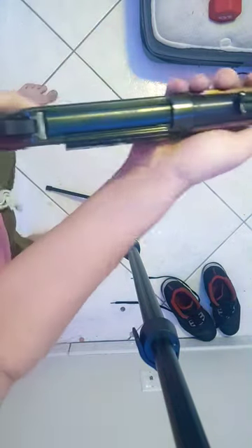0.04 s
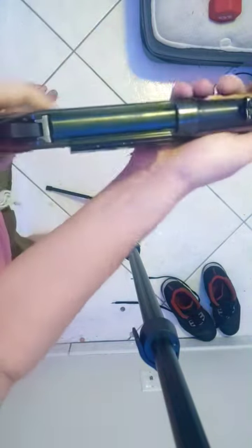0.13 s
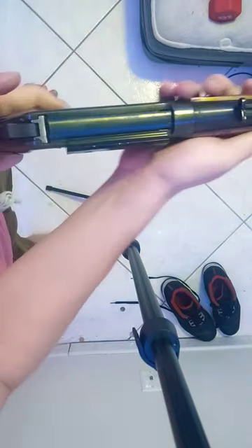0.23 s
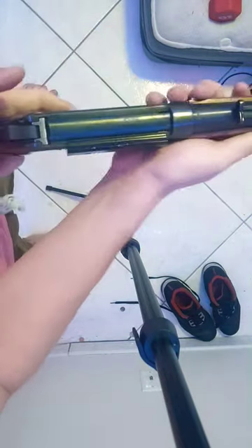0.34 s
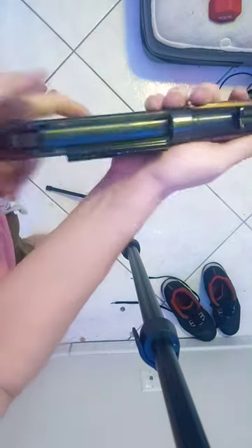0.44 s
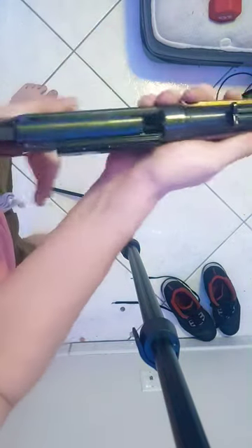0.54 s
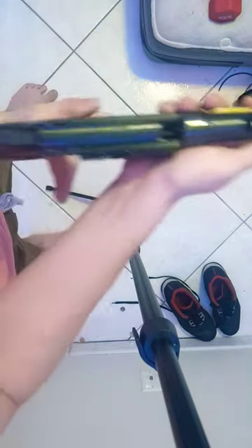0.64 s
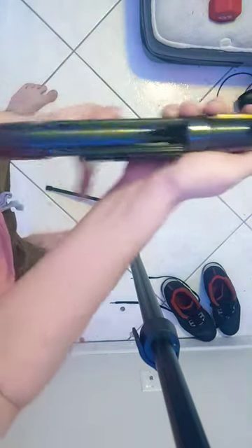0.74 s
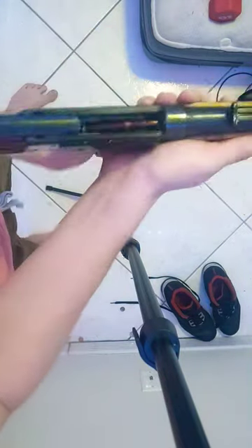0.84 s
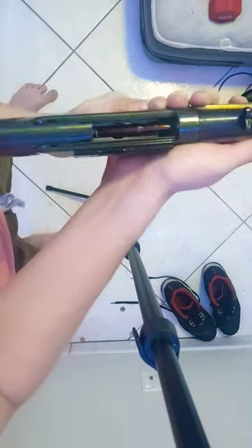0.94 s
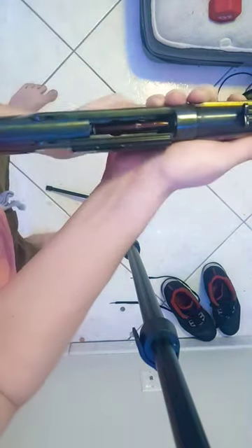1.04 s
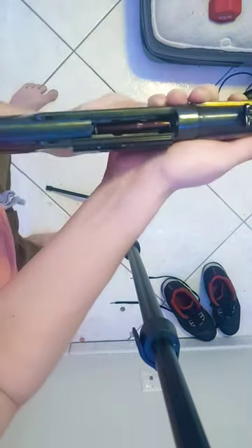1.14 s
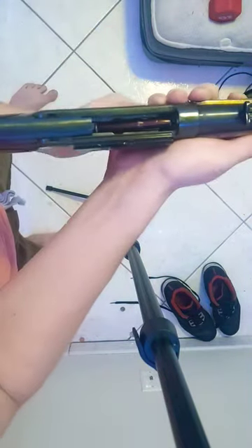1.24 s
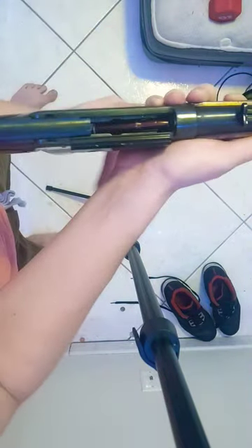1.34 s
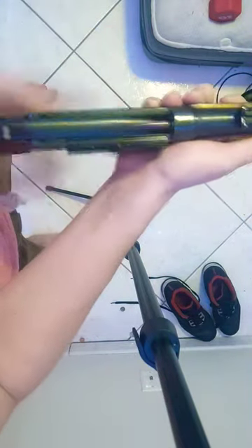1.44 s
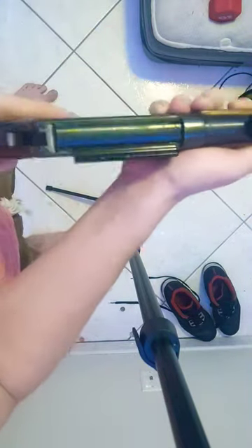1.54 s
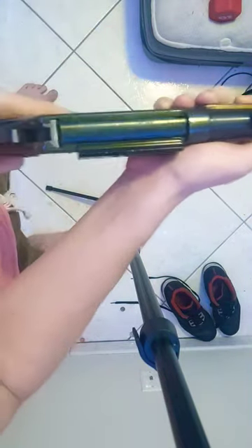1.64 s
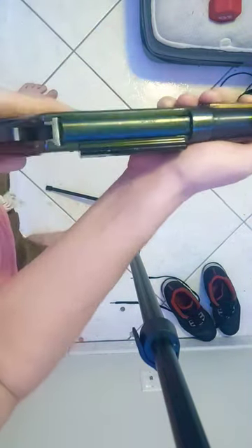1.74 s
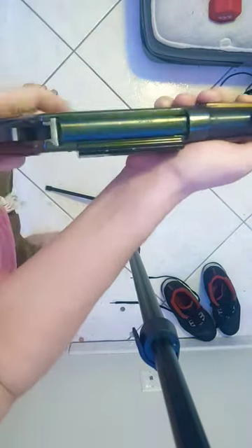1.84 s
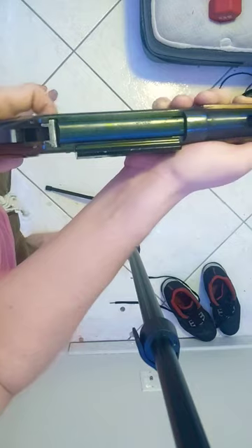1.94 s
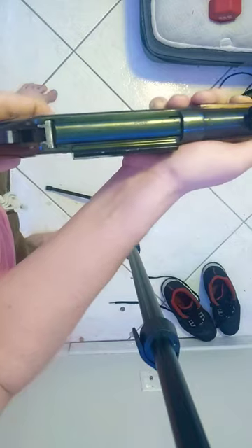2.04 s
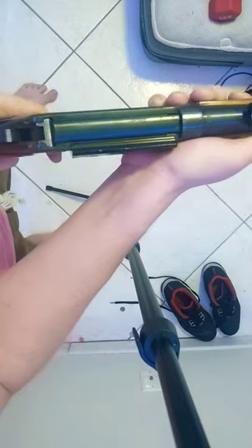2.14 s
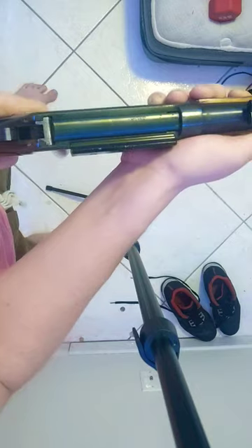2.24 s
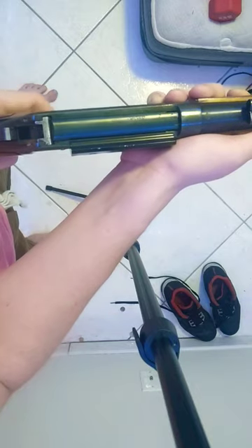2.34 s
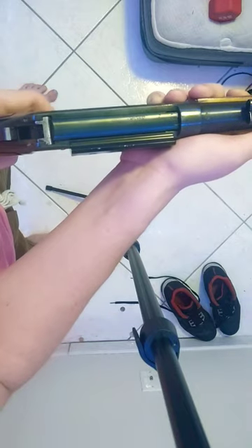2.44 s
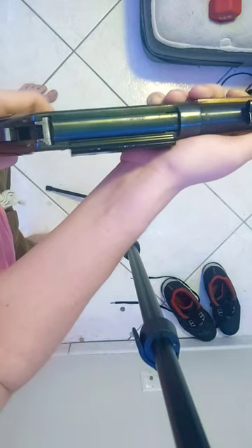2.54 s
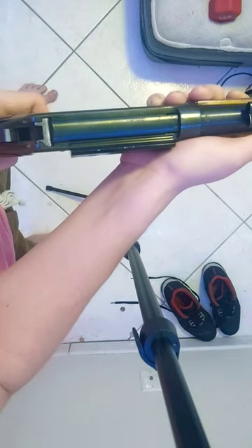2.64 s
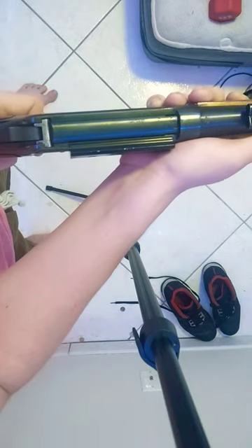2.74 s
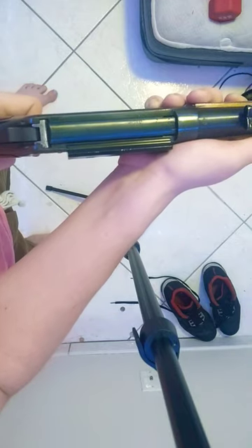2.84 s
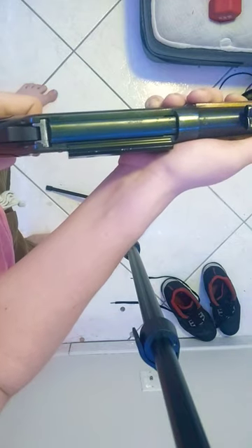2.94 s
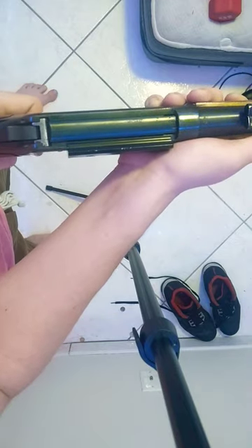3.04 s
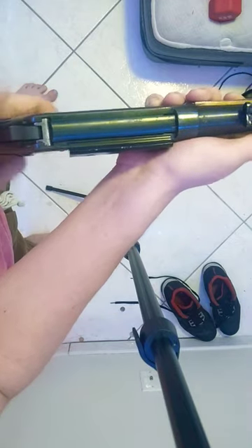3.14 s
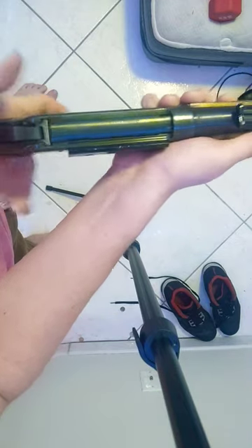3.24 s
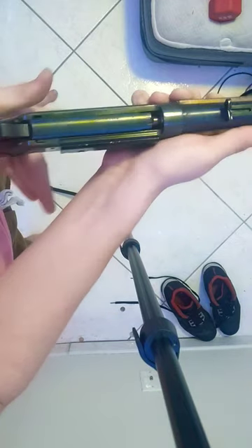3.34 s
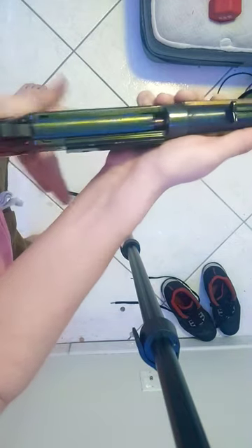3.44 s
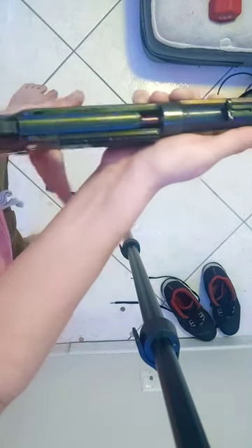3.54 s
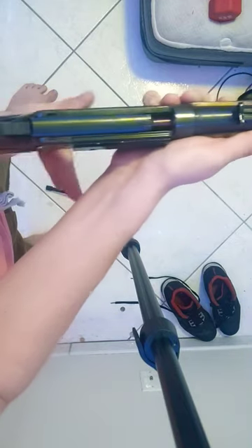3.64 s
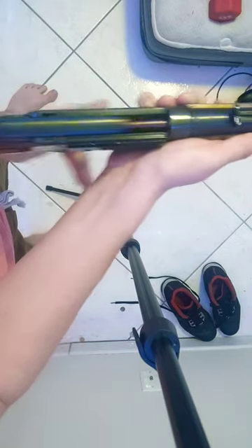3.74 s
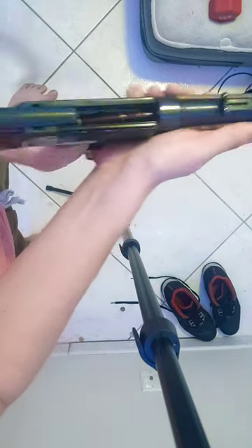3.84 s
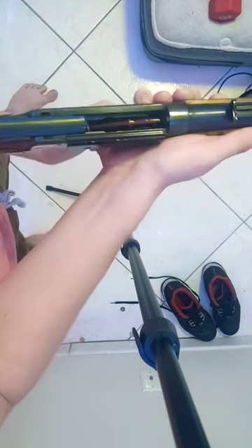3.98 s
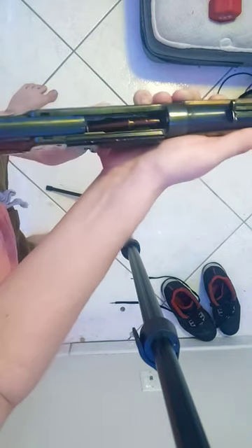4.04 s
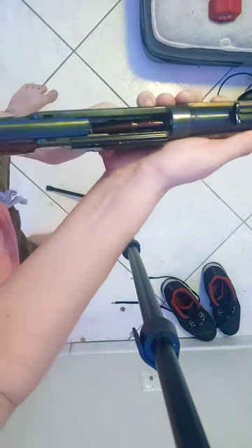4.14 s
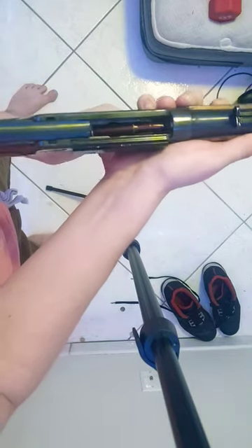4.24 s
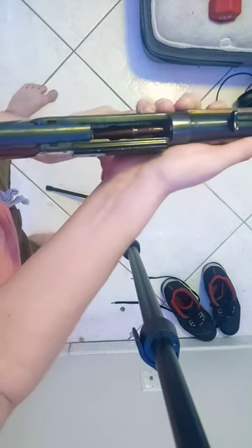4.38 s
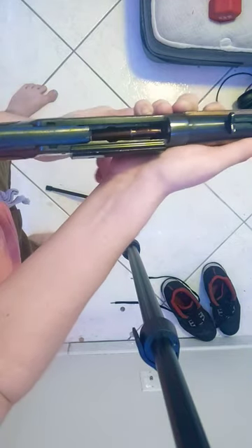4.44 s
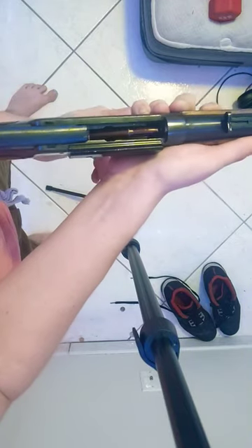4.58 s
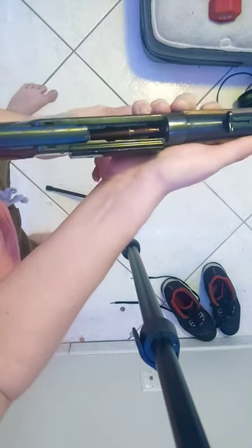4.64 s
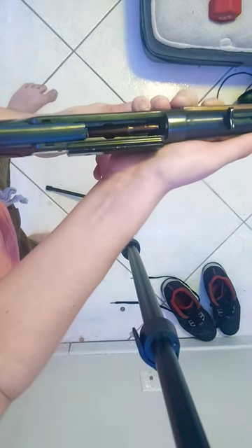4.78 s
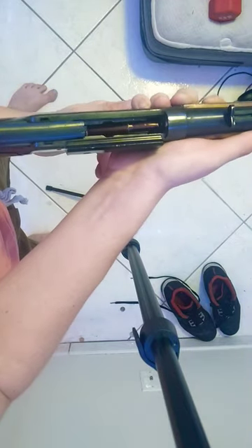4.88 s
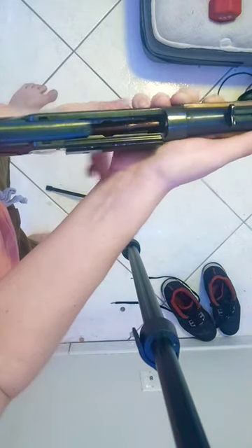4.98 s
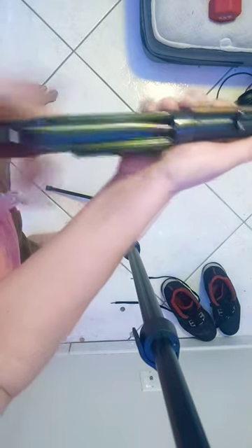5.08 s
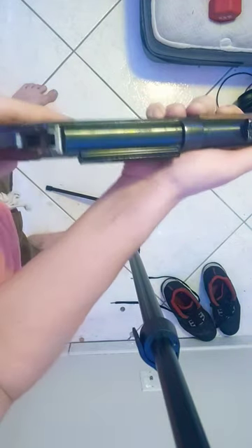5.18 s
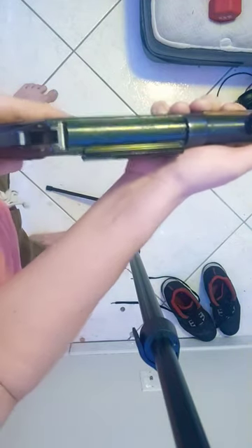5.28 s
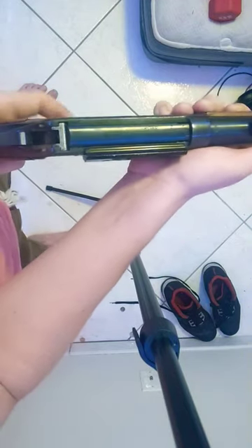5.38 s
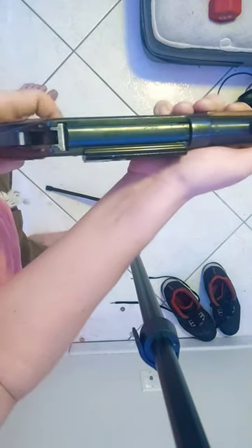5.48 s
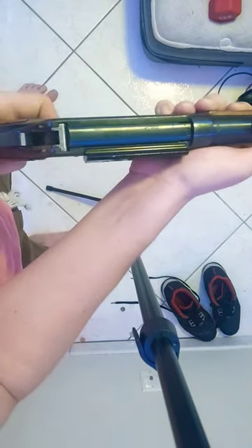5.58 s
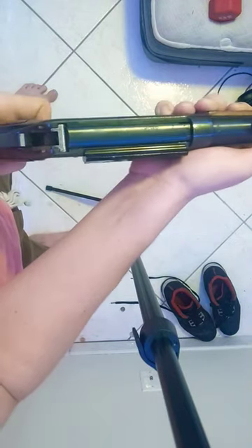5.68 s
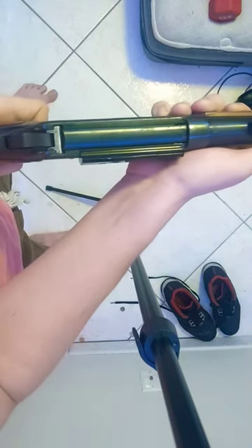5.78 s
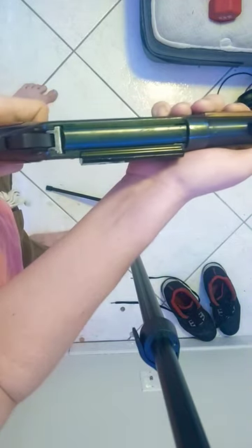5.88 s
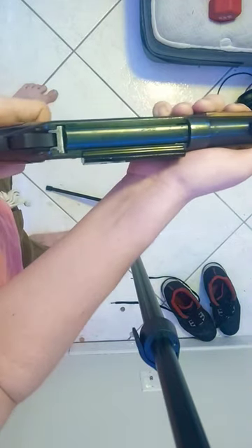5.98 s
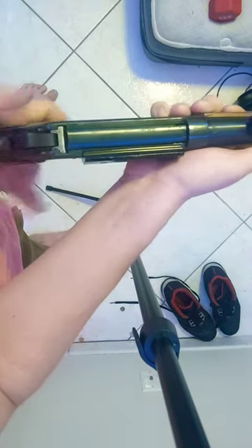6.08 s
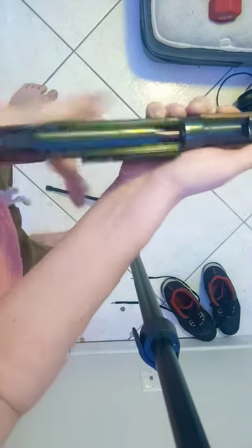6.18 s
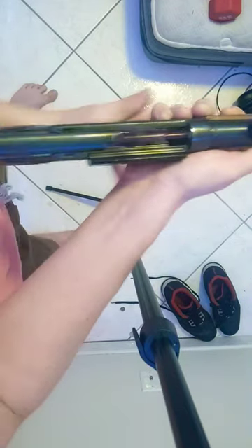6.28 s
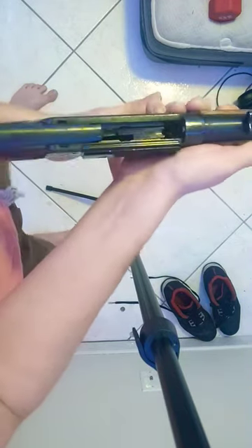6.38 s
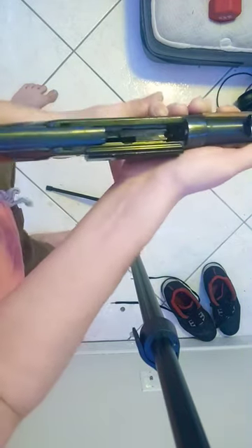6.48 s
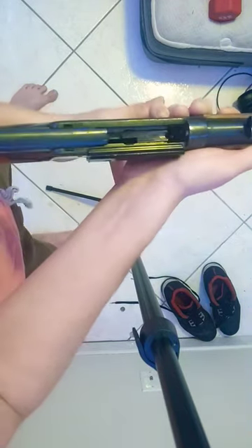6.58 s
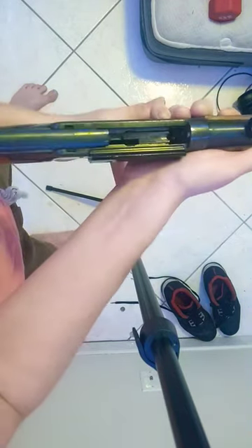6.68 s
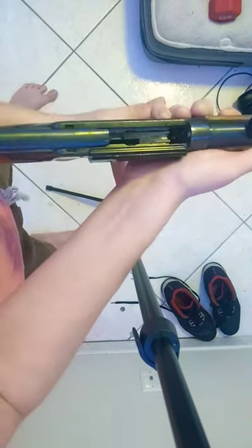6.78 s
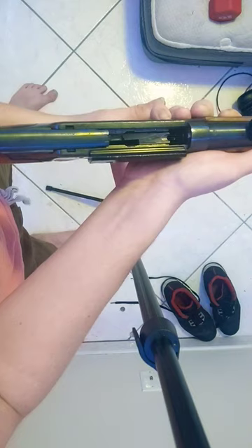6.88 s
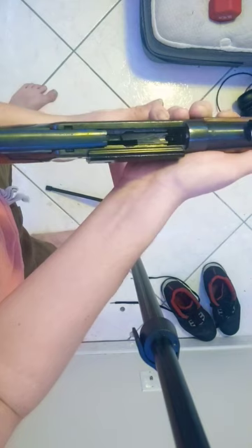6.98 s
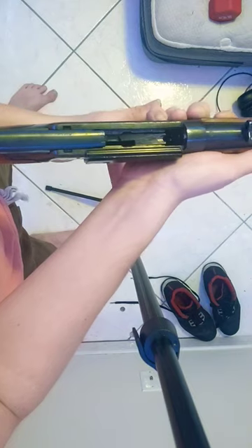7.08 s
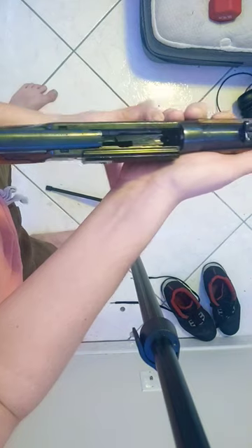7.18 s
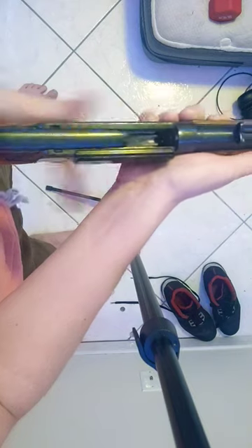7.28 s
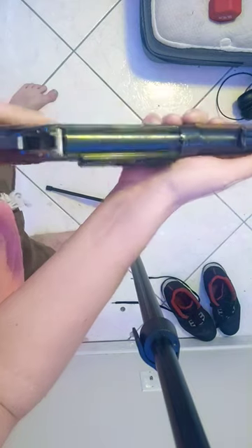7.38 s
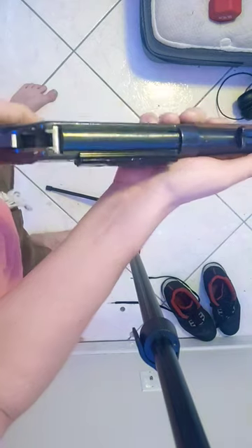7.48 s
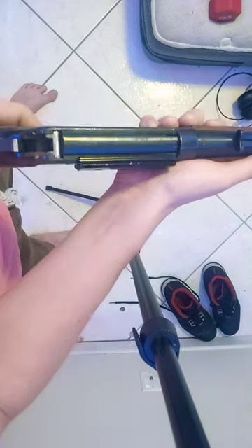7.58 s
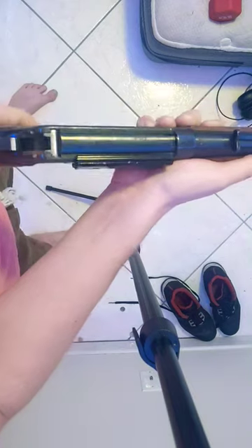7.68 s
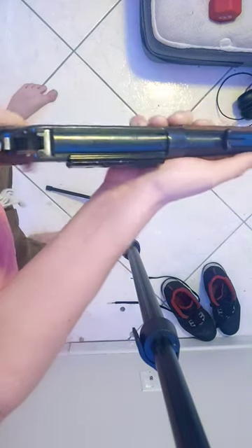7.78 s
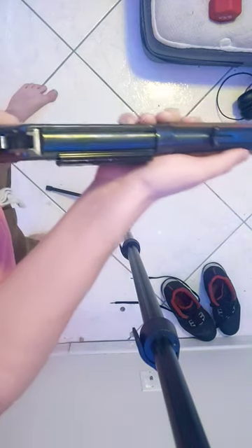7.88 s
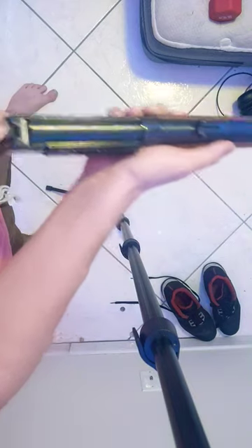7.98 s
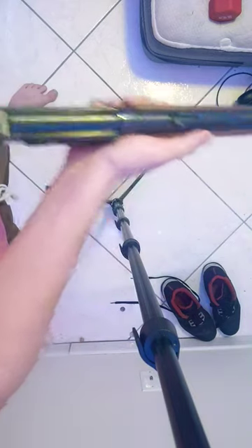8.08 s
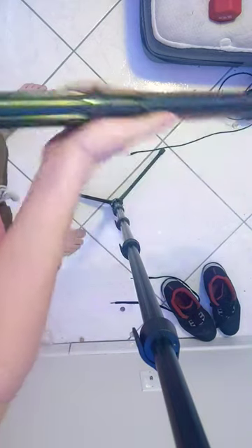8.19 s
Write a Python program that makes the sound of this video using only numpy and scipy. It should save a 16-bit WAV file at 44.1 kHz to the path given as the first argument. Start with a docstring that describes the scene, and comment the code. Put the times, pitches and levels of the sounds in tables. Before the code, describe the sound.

A quiet room with a faint low drone, miked very close. At about 0.55 s a rifle lever unlatches with a bright clack, small catches click, and at 0.94 the bolt hits its stop hard, with a thin high cartridge ring. After a pause, ticks and a chattering double clack close it at 1.5-1.65. The hammer snaps loudly at 2.9. The lever opens again at 3.4, with a sharp click at 3.6 and a double stop blow at 3.95. A cartridge knocks on the tiles from 4.7 to 5.16, rattling hollowly and ringing near 12 kHz; the lever clacks shut around 5.25. Another hammer snap with a low thump comes at 5.86. A quick opening clatters at 6.25-6.45; closing at 7.4-7.5 mixes with hard cartridge knocks, a deeper thump and bright shimmering rings. Bounces and clicks continue until about 8.15. Dense, short reflections follow every blow.

```python
"""Steel clacks close to the microphone: a lever rifle is cycled with dummy cartridges in a small tiled room.
Three times the lever opens and shuts, twice the hammer snaps: coloured bursts of noise with short body tones.
Ejected cases knock on the floor and ring near 12 kHz as beating sines; three low thumps hum on briefly.
Dense, fast-dying reflections answer every clack over faint room noise and a drone, and the recorder's
limiter holds the loudest blows down for a moment."""
import sys
import numpy as np
from scipy import signal
from scipy.fft import rfft, irfft
from scipy.io import wavfile
from scipy.ndimage import uniform_filter1d, minimum_filter1d

SR = 44100
rng = np.random.default_rng(int(sys.argv[2]) if len(sys.argv) > 2 else 0)


def wav_record(signal):
    """Record a signal, one row per channel, as 16-bit PCM in the file named by sys.argv[1]."""
    frames = np.transpose(np.atleast_2d(signal))
    bounded = np.clip(frames, -1, 1)
    # unit amplitude maps onto the largest positive 16-bit level
    quanta = np.round(bounded * 32767).astype(np.int16)
    wavfile.write(sys.argv[1], SR, quanta)


N = 362502  # samples

# colour of a steel clack, with the broad resonances of the receiver: f/Hz, relative level/dB per Hz
STEEL_COLOUR = [(60, -25), (200, -27), (550, -15.5), (950, -11.5), (1400, -3.5), (2000, 0.5), (2900, -1.5),
                (4600, 2), (7500, 3), (9500, -2.5), (11000, -1.5), (13500, -6), (15300, -4.5)]
# lever thrown open: unlatch t/s, bolt starts back t/s, bolt hits its stop t/s,
# unlatch level/dB, drag level/dB, stop level/dB, ring of the lifted cartridge level/dB
OPENINGS = [(0.546, .892, .938, -7.5, -21, 4, -9.5), (3.393, 3.811, 3.950, -2.5, -32.5, 3, -10.5),
            (6.254, 6.253, 6.428, -6, -26, 1, -44)]
# lever pulled shut: start t/s, cartridge seats t/s, bolt locks t/s, drag level/dB, blow level/dB
CLOSINGS = [(1.545, 1.613, 1.628, -16.5, 4), (5.15, 5.241, 5.268, -20.5, -0.5),
            (7.407, 7.485, 7.504, -22.5, 3.5)]
# ejected cartridges bouncing on the tiles: t/s, knock level/dB, ring level/dB
BOUNCES = [(4.720, -4.5, -3.5), (4.797, -8.5, -9), (4.934, -19, -4.5), (4.965, -14.5, -2.5),
           (5.093, -14.5, -3.5), (5.163, -11.5, -5.5), (7.415, -5.5, 0.5), (7.469, -1, -2),
           (7.725, -17.5, -44), (7.759, -7, -28.5), (7.847, -7, -5), (7.977, -35, -19), (8.111, -14, -6)]
SEAR_TILT = -1.5  # brightness of the sear and of the lever's play, dB per octave


def amp(db):
    """Decibels to gain."""
    return 10 ** (np.asarray(db) / 20)


def evened(x):
    """Scales to rms 1."""
    return x / np.sqrt(np.mean(x ** 2) + 1e-20)


def read(points, hz):
    """Reads a table on a log-frequency axis."""
    f, value = np.transpose(points)
    return np.interp(np.log(hz + 1), np.log(f + 1), value)


def add(mix, s, sound):
    """Mixes a sound in at time s."""
    part = mix[round(s * SR):][:len(sound)]
    part += sound[:len(part)]


def colour(x, points, tilt=0, size=2048):
    """Causal filter of unit power with the given spectrum, tilted about 5 kHz by dB per octave."""
    hz = abs(np.fft.fftfreq(size, 1 / SR))
    octaves = np.log2(np.clip(hz, 700, 10000) / 5000)
    gain = evened(amp(read(points, hz) + tilt * octaves))
    # minimum phase: the energy comes as early as the spectrum allows
    spectrum = np.exp(np.conj(signal.hilbert(np.log(gain))))
    taps = np.fft.ifft(spectrum).real
    return signal.fftconvolve(x, taps[:size // 2])[:len(x)]


def ring(modes, t):
    """Dying sines, one for each (Hz, dB, t60 s)."""
    return sum(amp(db - 60 * t / t60) * np.sin(2 * np.pi * hz * t) for hz, db, t60 in modes)


def grit(count, grain_db):
    """Noise that comes in millisecond catches of very uneven strength."""
    strengths = amp(grain_db * np.minimum(rng.exponential(1, 320), 3))
    snap = np.exp(-np.arange(50) / 22)
    envelope = np.outer(strengths, snap).ravel()
    return evened(envelope * rng.standard_normal(size=16000))[:count]


def contact(t, t60, chatter_db, chatter_t60, rise_s=0.00043, grain_db=5):
    """A burst of micro-impacts, coloured differently each time, then the ticking chatter of loose parts."""
    shape = amp(-60 * t / t60) * (1 - np.exp(-t / rise_s))
    z = rfft(shape * rng.standard_normal(len(t)))
    # partly flatten the spectrum, then shape the burst lightly again
    burst = irfft(z / abs(z) ** .65, len(t)) * shape ** .2
    chatter = amp(chatter_db - 60 * t / chatter_t60) * grit(len(t), grain_db)
    return burst * np.linalg.norm(shape) / np.linalg.norm(burst) + chatter


def resonate(x, hz, width):
    """A resonance of gain 1, width in Hz, that follows the curve hz."""
    turn = np.exp(2j * np.pi * np.cumsum(hz) / SR)
    r = np.exp(-np.pi * width / SR)
    return 2 * (turn * signal.lfilter([1 - r], [1, -r], x / turn)).real


def action():
    """The lever opens and shuts, the hammer falls, and small catches click in between."""
    # trigger pulled: sear ticks t/s, hammer strikes t/s, force level/dB, lead level/dB
    shots = [(2.825, 2.877, 6, -20), (5.772, 5.861, 5, -8.5)]
    # catches of lever, carrier and hammer: t/s, force level/dB, brightness/dB per octave
    catches = [(0.586, -16, 0.5), (.666, -13.5, 1), (.817, -15, 4), (1.474, -27.5, -1), (1.509, -17.5, 1.5),
               (1.531, -12, 4), (1.542, -10.5, 4), (1.594, -11.5, -4), (3.229, -36.5, -1),
               (3.248, -35.5, -3), (3.351, -33, 3), (3.588, -20.5, 5), (3.598, -20, 0), (3.619, -3, 4.5),
               (3.843, -10, 2), (3.903, -9.5, 2), (5.095, -16.5, -7), (5.172, -3, -3.5), (5.227, -4.5, -3),
               (5.882, 3.5, 4), (6.169, -29, -1.5), (6.309, -6, 2), (6.381, -12.5, 1.5),
               (7.334, -35.5, -2.5), (7.363, -30.5, -3), (7.393, -29, -4.5), (7.976, -10.5, 2),
               (8.124, -5.5, 2.5), (8.143, -7, -2.5)]
    # blows that land squarely and ring the receiver for a few cycles: t/s, level/dB, f/Hz
    square_blows = [(.939, -4, 2550), (3.619, -11, 1707), (3.958, -6.5, 2120), (5.227, -5.5, 2000),
                    (5.861, -7, 1350), (7.760, -9.5, 2040)]
    # knock of the stock under the hammer: f/Hz, level/dB, t60/s
    hammer_wood = [(470, -27.5, 0.02), (640, -23.5, 0.018)]
    open_tilt, stop_tilt, close_tilt = 3.7, 0.46, 1.8  # brightness, dB per octave
    lock_tilt, hammer_tilt = -0.61, 0.71  # dB per octave
    rebound_s, lead_s = 0.0062, 0.0073
    out, t = np.zeros(N), np.arange(SR // 6) / SR

    for unlatch, start, stop, unlatch_db, drag_db, stop_db, _ in OPENINGS:
        # a softer clack 4 ms before the unlatching clack
        add(out, unlatch - .004, clack(unlatch_db - 11.5, open_tilt))
        add(out, unlatch, clack(unlatch_db, open_tilt))
        # the bolt breaks loose with a click and slides back
        add(out, start, clack(-12, open_tilt))
        add(out, start, drag(stop - start, drag_db, open_tilt, swell_db=1.5))
        # it rebounds once from its stop, and the loose carrier rattles on
        add(out, stop, clack(stop_db, stop_tilt))
        add(out, stop + rebound_s, clack(stop_db - 1.5, stop_tilt))
        add(out, stop + rebound_s, drag(.04, stop_db - 26, stop_tilt, swell_db=-3))
    for start, seat, lock, drag_db, blow_db in CLOSINGS:
        add(out, start, drag(lock - start, drag_db, close_tilt, swell_db=-2.5))
        for s in (seat, lock):
            add(out, s, clack(blow_db, lock_tilt))
    for sear, strike, db, lead_db in shots:
        add(out, sear, clack(-34, SEAR_TILT))
        # a softer clack 7 ms before the hammer strike
        add(out, strike - lead_s, clack(lead_db, hammer_tilt))
        add(out, strike, clack(db, hammer_tilt) + amp(db) * ring(hammer_wood, t))
    for s, db, tilt in catches:
        add(out, s, clack(db, tilt))
    for s, db, hz in square_blows:
        # 20 cycles until the tone has fallen 60 dB
        add(out, s, ring([(hz, db, 20 / hz)], t))
    return out


def clack(db, tilt, detune=0.17, spread_db=3, rise_s=.001):
    """One blow of steel on steel; the body answers a little differently to each."""
    # short hollow tones of the wooden stock and the receiver: f/Hz, level/dB, t60/s
    body = [(400, -41.5, 0.0083), (620, -41.5, 0.02), (2050, -30.5, 0.01)]
    t = np.arange(SR // 6) / SR
    burst = contact(t, t60=0.024, chatter_db=-16, chatter_t60=0.05)
    steel = colour(burst, STEEL_COLOUR, tilt)
    chance = 2 * rng.random((len(body), 2)) - 1
    modes = [(hz * (1 + detune * a), level + spread_db * b, t60)
             for (hz, level, t60), (a, b) in zip(body, chance)]
    return amp(db) * (steel + ring(modes, t) * (1 - np.exp(-t / rise_s)))


def drag(length, db, tilt, swell_db, grain_db=-1.5, grit_db=-4.5):
    """Parts slide over each other: grit and small random catches, growing or fading along the way."""
    count, out = round(length * SR), np.zeros(SR // 2)
    swell = amp(grit_db + swell_db * np.linspace(-.5, .5, count))
    add(out, 0, swell * colour(grit(count, grain_db), STEEL_COLOUR, tilt))
    ticks = max(round(length * 70), 1)  # 70 per second
    for k in range(ticks):
        along = (k + rng.random()) / ticks
        strength, hue = 2 * rng.random(2) - 1
        tick_db = 7.5 + 1.5 * strength + swell_db * (along - .5)
        add(out, along * length, clack(tick_db, tilt + 3 * hue))
    return amp(db) * out


def landings(grain_db=4):
    """Cartridges knock dully on the floor; after a hard landing they rattle with a hollow, sinking tone."""
    # colour of a knock on the tiles: f/Hz, relative level/dB per Hz
    knock_colour = [(60, -40), (200, -13), (500, -11.5), (1000, -11), (2000, -1), (3500, 0.5), (5500, -0.5),
                    (7000, -10), (10000, -16.5), (15500, -21)]
    # rattles after hard landings: t/s, length/s, rattle level/dB, hollow tone level/dB, its first f/Hz
    rattles = [(4.718, .08, -21, -50, 1520), (4.791, 0.046, -26, -30, 500), (4.94, .085, -21, -31, 1980),
               (7.419, 0.06, -22, -33, 300), (7.847, .04, -23.5, -43, 1170)]
    # the tone sinks towards hollow_hz, then dies
    hollow_hz, width_hz, sink_s, hollow_t60 = 280, 330, .024, 0.16
    out, t = np.zeros(N), np.arange(SR // 4) / SR
    for s, db, _ in BOUNCES:
        knock = contact(t, t60=0.014, chatter_db=-14, chatter_t60=0.13)
        add(out, s, amp(db) * colour(knock, knock_colour))
    for s, length, rattle_db, tone_db, first_hz in rattles:
        add(out, s, drag(length, rattle_db, tilt=-6, swell_db=-15))
        hz = hollow_hz + (first_hz - hollow_hz) * np.exp(-t / sink_s)
        once = resonate(grit(len(t), grain_db), hz, width_hz)
        tone = evened(resonate(once, hz, width_hz))
        fade_db = -60 * np.maximum(t - length / 2, 0) / hollow_t60
        add(out, s, amp(tone_db + fade_db) * tone)
    return out


def brass(spread_hz=55, side_db=-7, tick_db=-11):
    """A knocked case ticks, then rings near 12 kHz; weaker modes close by beat against the main one."""
    # main ringing tone over time: t/s, f/Hz
    ring_hz = [(.9, 12080), (4.7, 12030), (5.3, 12000), (7.4, 11940), (8.2, 11910)]
    # colour of the first touch on thin brass: f/Hz, relative level/dB per Hz
    tick_colour = [(3000, -17), (9000, -1.5), (12000, -3.5), (15500, -8)]
    out, t = np.zeros(N), np.arange(SR // 2) / SR
    # (s, dB, t60 s): cases held in the carrier, one chattering up the feed ramp damped by steel, loose ones
    lifted = [(stop, db, .25) for _, _, stop, _, _, _, db in OPENINGS]
    fed = [(1.550 + k * .0155, -4.5, 0.061) for k in range(3)]
    dropped = [(s, db, 0.37) for s, _, db in BOUNCES]
    for s, db, t60 in lifted + fed + dropped:
        hz = np.interp(s, *np.transpose(ring_hz))
        side_hz = hz + spread_hz * rng.standard_normal((6, 1))
        sides = np.sin(2 * np.pi * (side_hz * t + rng.random((6, 1)))).sum(0)
        fade = amp(-60 * t / t60) * (1 - np.exp(-t / .002))
        tone = fade * (np.sin(2 * np.pi * hz * t) + amp(side_db) * sides)
        add(out, s, amp(db) * tone * np.linalg.norm(fade) / np.linalg.norm(tone))
        tick = contact(t[:SR // 6], t60=0.032, chatter_db=-11, chatter_t60=0.076)
        add(out, s, amp(db + tick_db) * colour(tick, tick_colour))
    return out


def low_thumps(rise_s=0.00033):
    """Low thumps with a short hum, and a faint thud under each landing: dying sines with a quick rise."""
    # thumps: t/s, level/dB
    thumps = [(2.875, -25), (5.860, -16.5), (7.420, -11)]
    # thump tones: f/Hz, level/dB, t60/s
    thump_modes = [(78, 0, .05), (100, -11, .55), (165, -20, .35)]
    # dull thud of the floor, relative to the knock of the landing: f/Hz, level/dB, t60/s
    floor_modes = [(45, -44.5, .2), (89, -36, 0.21), (160, -33.5, 0.2)]
    out, t = np.zeros(N), np.arange(SR // 2) / SR
    rise = 1 - np.exp(-t / rise_s)
    thump, thud = ring(thump_modes, t) * rise, ring(floor_modes, t) * rise
    for s, db in thumps:
        add(out, s, amp(db) * thump)
    for s, db, _ in BOUNCES:
        add(out, s, amp(db) * thud)
    return out


def hands(tilt=1, grain_db=4, count=3):
    """Skin rubs faintly on the stock, and the lever ticks in its play before each stroke."""
    # hands shifting on the wood: t/s, length/s, level/dB
    rustles = [(0, 0.27, -69.5), (6.974, 0.088, -71.5)]
    out = np.zeros(N)
    for s, length, db in rustles:
        rub = grit(round(length * SR), grain_db)
        add(out, s, amp(db) * colour(rub, STEEL_COLOUR, tilt))
    for start, *_ in OPENINGS + CLOSINGS:
        # the hand takes hold within the last 0.14 s
        for early, strength in rng.random((count, 2)):
            add(out, start - 0.14 * early, clack(-55.5 + 4 * (2 * strength - 1), SEAR_TILT))
    return out


def tail(build_s=0.0044):
    """Dense reflections off tiles and walls build up quickly; each band dies at its own speed."""
    # decay of the room: f/Hz, t60/s
    decay = [(150, 0.55), (600, 0.47), (1800, 0.43), (4500, 0.37), (9000, 0.38), (15000, 0.28)]
    count = SR // 10
    # one reflection of random sign in every 10 samples
    taps = np.zeros(SR)
    taps[np.arange(count) * 10 + rng.integers(0, 10, count)] = rng.choice([-1., 1.], count)
    hz, t, z = signal.stft(taps, SR, nperseg=256)
    fade = amp(-60 * t / read(decay, hz)[:, None])
    echo = signal.istft(z * fade, SR, nperseg=256)[1][:SR]
    echo *= 1 - np.exp(-(np.arange(SR) / SR / build_s) ** 2)
    return echo / np.linalg.norm(echo)


def room(x, wet_db, change_hz, count=6):
    """Crossfades quickly among several reflection patterns, so the reverberation sounds even and noise-like."""
    # the sound is handed round a circle of tails, change_hz of them a second
    place = np.arange(N) / SR * change_hz
    wet = 0
    for k in range(count):
        away = abs((place - k + count / 2) % count - count / 2)
        share = np.cos(np.pi / 2 * np.minimum(away, 1))
        wet = wet + signal.oaconvolve(x * share, tail())[:N]
    return x + amp(wet_db) * wet


def air():
    """Faint steady room noise with a low drone: filtered noise, the drone in narrow bands that waver."""
    # colour of the room noise: f/Hz, relative level/dB per Hz
    air_colour = [(12, -68.5), (20, -40), (70, -3), (127, -14.5), (158, 2.5), (193, -21), (222, -7.5),
                  (262, -19), (367, -14), (399, -20), (1860, -31), (2390, -32), (5230, -41.5), (7730, -41),
                  (16000, -48.5)]
    # wavering drone: f/Hz, distance to half gain/Hz, level/dB
    drone_bands = [(82, 15, -64), (175, 6, -71)]
    hz = np.fft.rfftfreq(N, 1 / SR)

    def noise(gain):
        """White noise shaped by a gain curve, at rms 1."""
        return evened(irfft(rfft(rng.standard_normal(N)) * gain, N))

    drone = sum(amp(db) * noise(1 / (1 + ((hz - f) / width) ** 2)) for f, width, db in drone_bands)
    return amp(-59) * noise(amp(read(air_colour, hz))) + drone


def scene():
    """Rifle and cases in the room; such small parts radiate little bass."""
    bass_cut = signal.butter(2, 190, "highpass", fs=SR, output="sos")
    clatter = signal.sosfilt(bass_cut, action() + landings() + hands())
    near = room(clatter, wet_db=0.5, change_hz=90.34, count=7)
    near = near + room(brass(), wet_db=-2.5, change_hz=23, count=3)
    return (near + low_thumps() + air())[None]


def record(dry, limit_db=-6.5, hold_s=0.076, recover_db_per_s=190):
    """The limiter ducks at each loud attack, holds, then lets go; peaks round off; then the band limit."""
    power_db = 10 * np.log10(abs(uniform_filter1d(dry[0] ** 2, size=44)) + 1e-12)
    over_db = np.maximum(power_db - limit_db, 0)
    count = int(hold_s * SR) | 1
    held_db = -minimum_filter1d(-over_db, count, origin=count // 2, mode="constant")
    # recovery at a steady rate in dB, with the corners smoothed over 66 samples
    fall = np.arange(N) * recover_db_per_s / SR
    duck_db = uniform_filter1d(np.maximum.accumulate(held_db + fall) - fall, size=66)
    out = dry * amp(-duck_db)
    out = out / (1 + (out / .92) ** 6) ** (1 / 6)
    band = signal.firwin(511, 15550, window=("kaiser", 9), fs=SR)  # lowpass edge in Hz
    return signal.oaconvolve(out, band[None], "same")


dry = scene()
out = record(dry)
wav_record(out)
```